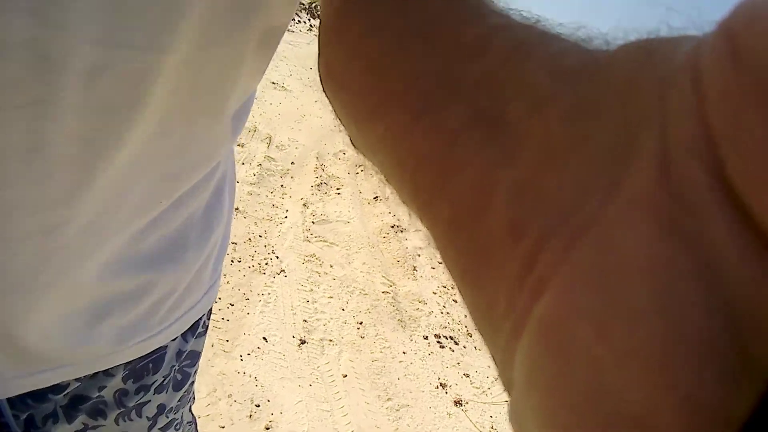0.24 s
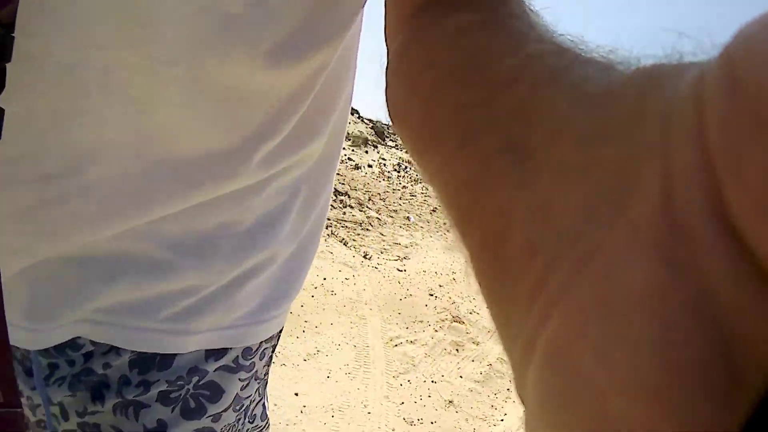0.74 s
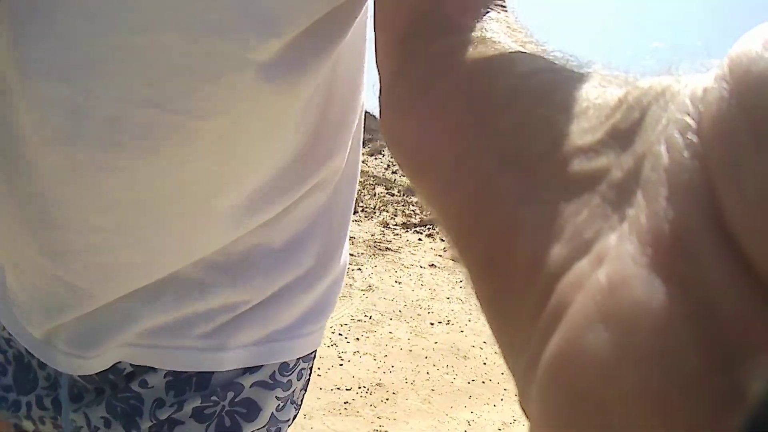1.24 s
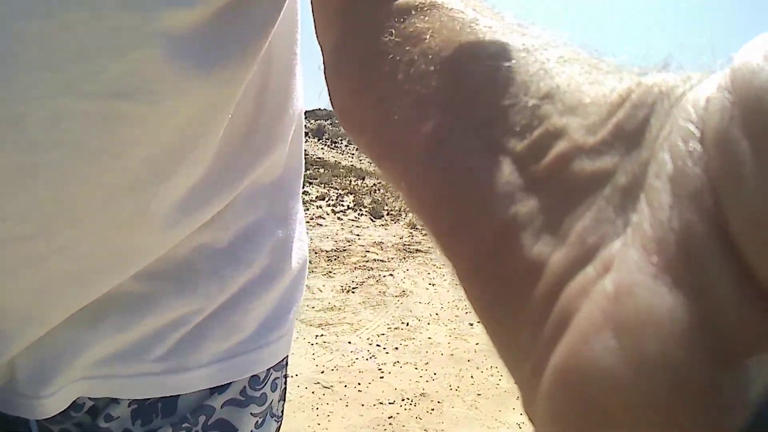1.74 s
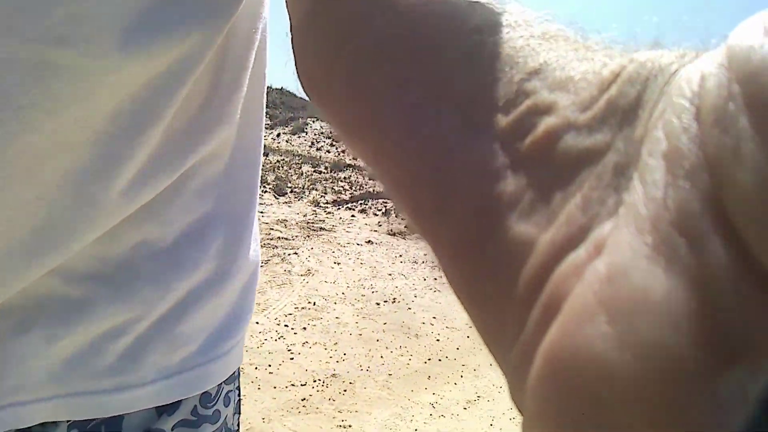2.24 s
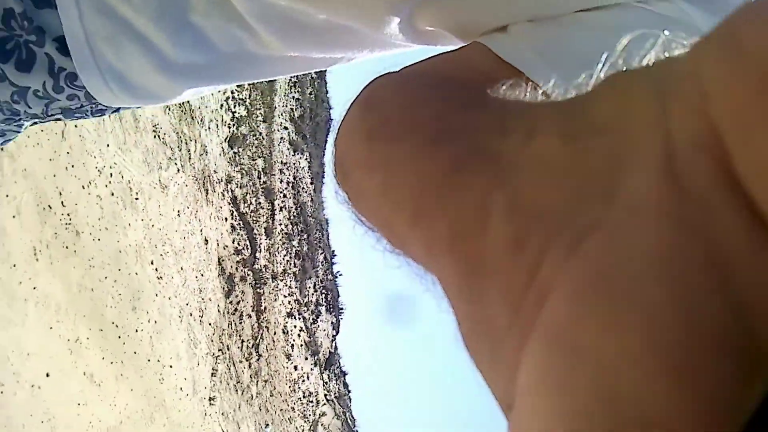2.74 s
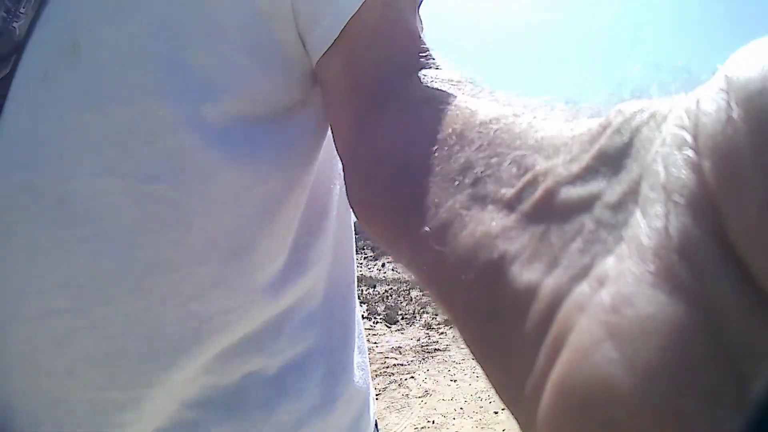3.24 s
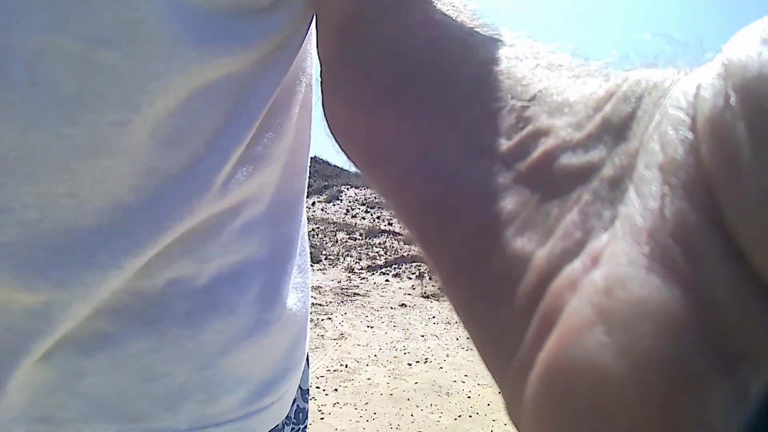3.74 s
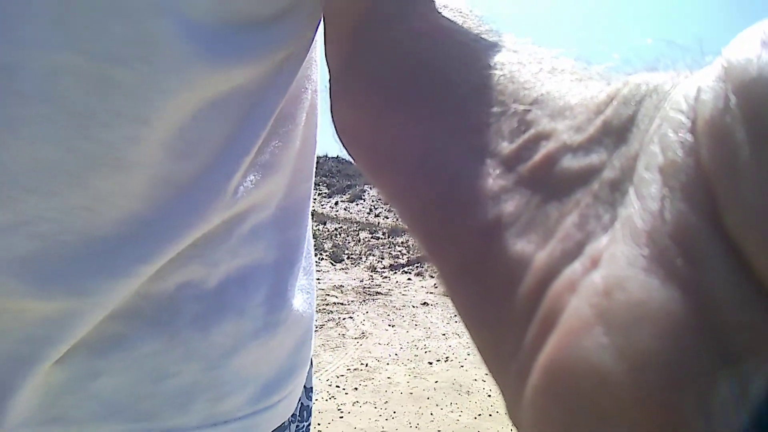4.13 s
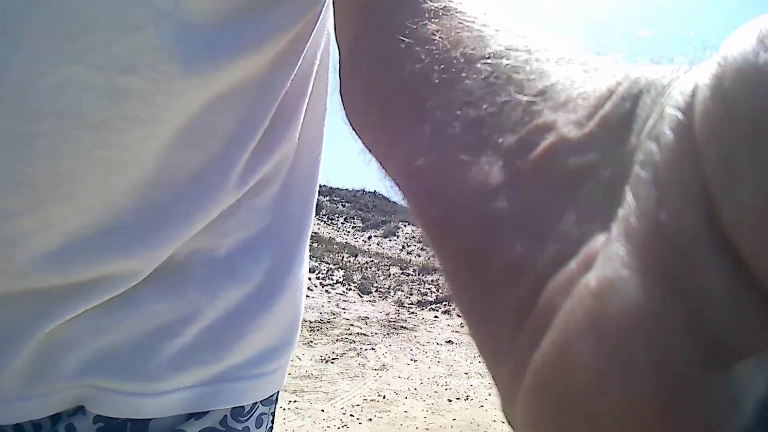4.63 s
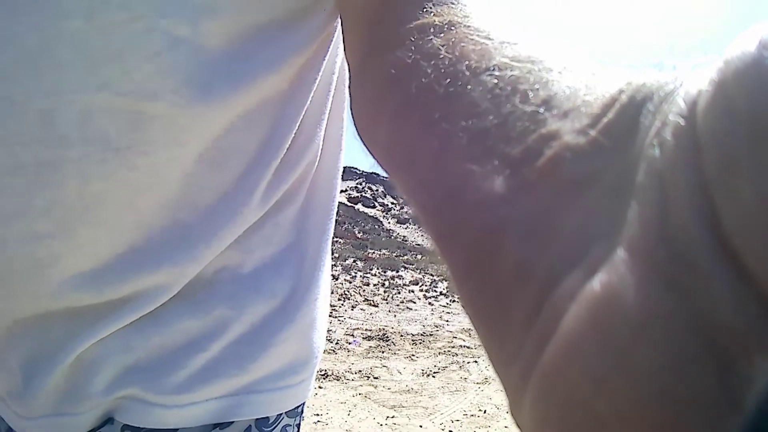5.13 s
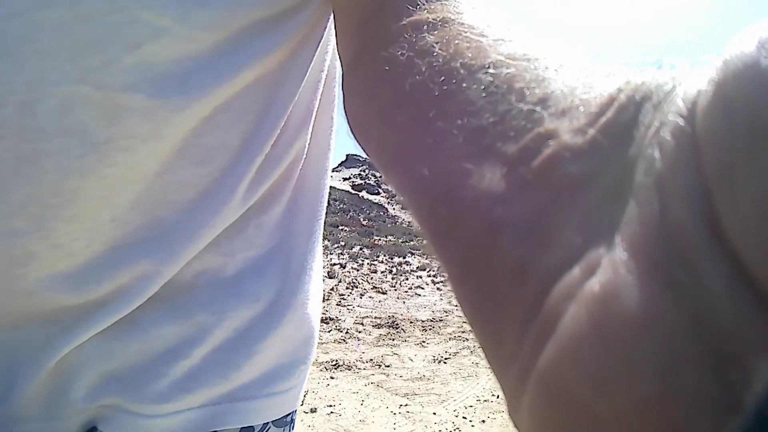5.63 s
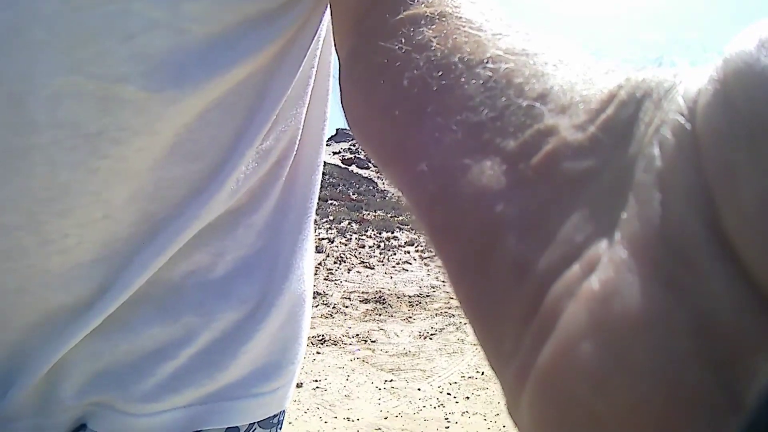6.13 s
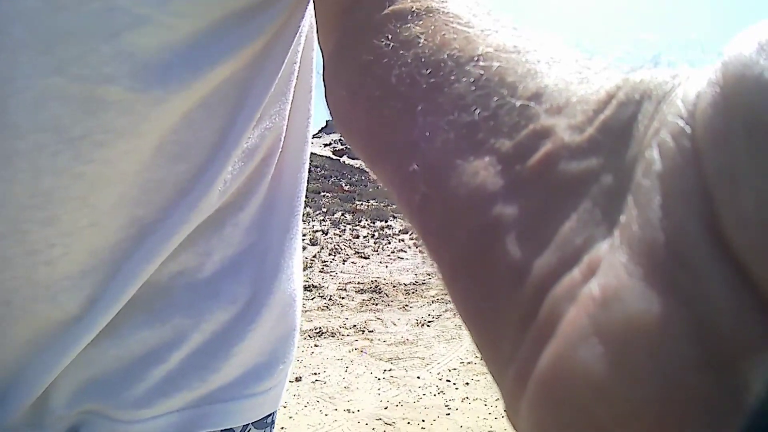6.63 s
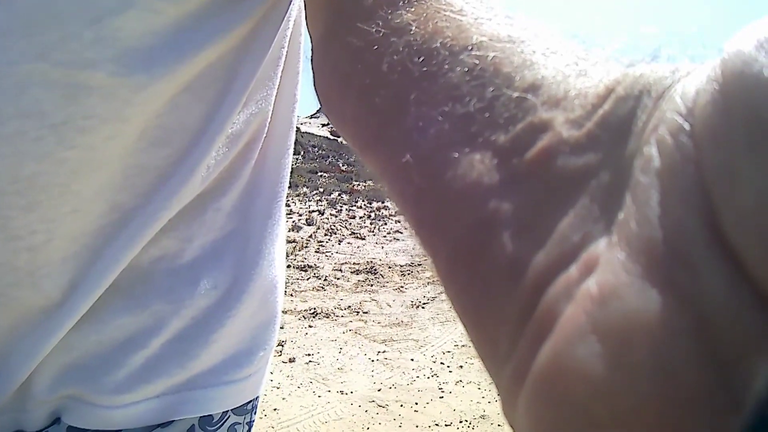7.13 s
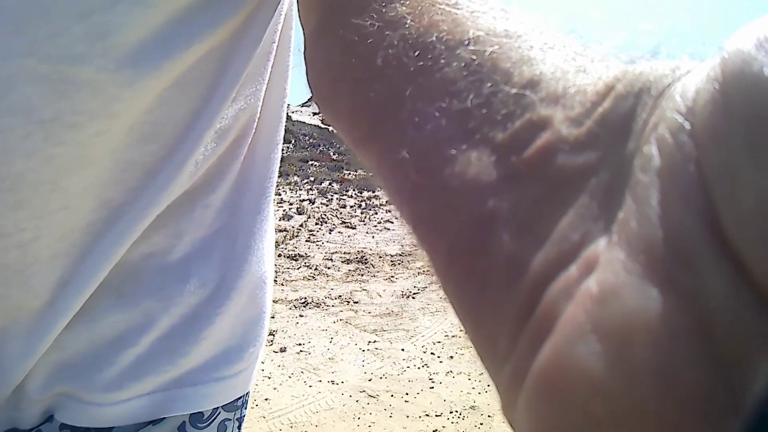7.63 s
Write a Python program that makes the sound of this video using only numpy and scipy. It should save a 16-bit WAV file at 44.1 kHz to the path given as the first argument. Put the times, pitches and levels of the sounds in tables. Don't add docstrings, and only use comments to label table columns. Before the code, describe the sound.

Hand rubs and knocks on a hollow foam shell, then a small electric motor revs up, sags, and bursts into a loud steady whine.

```python
import sys
import numpy as np
from scipy import signal
from scipy.fft import rfft, irfft
from scipy.io import wavfile
from scipy.ndimage import uniform_filter1d, minimum_filter1d

SR = 44100
rng = np.random.default_rng(int(sys.argv[2]) if len(sys.argv) > 2 else 0)


def waveform_to_disk(signal):
    frames = np.transpose(np.atleast_2d(signal))
    scaled = np.clip(frames, -1, 1) * 32767
    samples = np.round(scaled).astype(np.int16)
    wavfile.write(sys.argv[1], SR, samples)


def field_ratio(decibels):
    return 10 ** (np.asarray(decibels, dtype=float) / 20)


N = 347067

# (centre [Hz], width [Hz], level [dB])
SHELL = [(260, 16, 0), (400, 120, -12), (596, 610, 22.5), (790, 240, 18), (1310, 150, 20), (2100, 78, 18),
         (3200, 500, -53)]
FULL_HZ = 330


def evened(x):
    return x / np.sqrt(np.mean(x ** 2) + 1e-20)


def coloured(points):
    f, db = np.transpose(points)
    hz = np.fft.rfftfreq(N + 1, 1 / SR)
    gain = field_ratio(np.interp(np.log(hz + 1), np.log(f), db))
    return evened(irfft(rfft(rng.standard_normal(N + 1)) * gain)[:N])


def drift(rate_hz):
    step = 40
    lowpass = signal.butter(2, rate_hz, fs=SR / step, output="sos")
    slow = signal.sosfilt(lowpass, rng.standard_normal(N // step + 2))
    return evened(np.interp(np.arange(N) / step, np.arange(len(slow)), slow))


def resonate(x, hz, width):
    return signal.lfilter(*signal.iirpeak(hz, hz / width, SR), x)


def curve(rows):
    s, *columns = np.transpose(rows)
    return [np.interp(np.arange(N) / SR, s, c) for c in columns]


def breeze():
    # (frequency [Hz], density [dB per Hz])
    wind = [(15, -35), (25, 0), (58, 2.5), (97, -6.5), (176, -5.5), (592, -17.5), (1330, -19.5),
            (2620, -33), (3170, -34), (4000, -46.5), (5200, -75.5), (8800, -120)]
    return field_ratio(-52 + 0.94 * drift(3.1)) * coloured(wind)


def strokes(column, fade_db):
    # (start [s], hold [s], rub level [dB], low ring level [dB], rumble level [dB])
    rubs = [(0.0, 0.11, -52.5, -36, -40), (0.126, 0.053, -30, -51, -44), (.195, 0.15, -43.5, -43, -45),
            (0.33, 0.0096, -31, -26.5, -42), (0.364, .03, -52, -52, -42), (0.401, 0.055, -46, -62, -47),
            (1.458, 0.0085, -46, -70, -54), (1.484, .095, -49.5, -47, -53), (1.583, 0.057, -30.5, -24, -52),
            (1.673, 0.019, -36, -40, -50), (1.716, 0.097, -26, -19.5, -45), (1.803, 0.14, -31, -30.5, -42),
            (2.992, .09, -27, -51, -58)]
    attack_s = 0.0034
    t, power = np.arange(N) / SR, np.zeros(N)
    for row in rubs:
        rise = np.clip((t - row[0]) / attack_s, 0, 1)
        fade = fade_db * np.clip(t - row[0] - row[1], 0, 1)
        power += (rise * field_ratio(row[column] - fade)) ** 2
    return np.sqrt(power)


def knock(db, hz, bright_db, crack):
    t = np.arange(len(crack)) / SR
    blow = crack * field_ratio(-60 * t / 0.011)
    patch = resonate(blow, hz, 360)
    mode = np.sin(2 * np.pi * hz * t) * field_ratio(-60 * t / 0.047)
    body = 0.67 * patch / abs(patch).max() - 0.5 * mode
    boom = -0.3 * np.sin(2 * np.pi * SHELL[0][0] * t) * field_ratio(-60 * t / 0.068)
    bright = resonate(resonate(crack, 1470, 1200), 1800, 2500)
    tick = field_ratio(bright_db + 9.0) * bright * field_ratio(-60 * t / 0.029)
    return field_ratio(db - 6.0) * np.minimum(t / 0.0021, 1) * (body + boom + tick)


def shell_knocks():
    # (time [s], peak level [dB], pitch [Hz], bright part [dB])
    blows = [(0.118, -21, 780, -7), (0.136, -23, 580, -16), (0.14, -21, 794, 12), (0.154, -15, 720, -5),
             (0.174, -24, 824, -13), (0.221, -22, 660, 3), (0.259, -15.5, 776, -26), (0.297, -24, 750, -7),
             (0.313, -18, 660, -8), (0.337, -10.5, 637, -38), (0.406, -30.5, 1220, 5),
             (0.434, -24.5, 1260, -16), (0.877, -33, 835, -10), (1.024, -36.5, 1380, 4),
             (1.199, -37, 1510, -16), (1.349, -54, 681, -15), (1.462, -29, 1180, -26),
             (1.55, -17, 840, -30), (1.584, -4, 711, -31), (1.604, -17, 740, -23), (1.628, -21.5, 950, 6.5),
             (1.671, -18, 850, -23), (1.706, -12, 730, -25), (1.748, -21, 711, -15), (1.796, -12, 960, -27),
             (2.714, -7.5, 1160, -22)]
    length = 3000
    out = np.zeros(N + length)
    for (s, *blow), crack in zip(blows, rng.standard_normal((len(blows), length))):
        out[round((s + 0.0015) * SR):][:length] += knock(*blow, crack)
    return out[:N]


def shell_rubbing():
    grit = rng.standard_normal(N) * field_ratio(2.4 * drift(73))
    (low_hz, low_width, _), *upper = SHELL
    rub = evened(sum(field_ratio(db) * resonate(resonate(grit, hz, width), hz, 2.2 * width)
                     for hz, width, db in upper))
    noise_ring = resonate(resonate(rng.standard_normal(N), low_hz, low_width), low_hz, 3.5 * low_width)
    steady_ring = np.sin(2 * np.pi * low_hz * np.arange(N) / SR + 1.4 * drift(14.3))
    ring = evened(evened(noise_ring) + 1.5 * steady_ring)
    rumble = coloured([(20, -4), (60, -0.5), (170, -7.5), (400, -14.5), (900, -42)])
    rub_fade, ring_fade = 700, 454
    held = strokes(2, rub_fade) * field_ratio(-2.0) * rub + strokes(4, rub_fade) * rumble
    return held + strokes(3, ring_fade) * field_ratio(-5.5) * ring


def order_levels(speed, effort_db, squeeze_db, lean_db):
    # (level at full speed [dB], slope [dB per octave], squeeze share [1], lean share [1])
    order_1 = (-13.5, 22.5, -0.08, 1.1)
    order_2 = (-8.5, 20, -0.15, -1.48)
    order_4 = (-15.5, 14.5, 0.73, 0.94)
    order_6 = (-26, 11.5, 0.2, 1.14)
    octaves = np.log2(speed / FULL_HZ)
    levels = []
    for full_db, slope_db, squeeze_share, lean_share in (order_1, order_2, order_4, order_6):
        grip_db = squeeze_share * squeeze_db + lean_share * lean_db
        levels.append(effort_db + full_db + slope_db * octaves + grip_db)
    return levels


def airframe_db(hz):
    # (centre [Hz], width [Hz], lift [dB])
    modes = [(262, 66, 4.5), (523, 130, 0.5), (950, 167, 7.5), (1557, 211, 11.5)]
    grid = np.arange(6000.)
    lift = sum(db / (1 + (2 * (grid - f) / width) ** 2) for f, width, db in modes)
    return np.interp(hz, grid, lift)


def shaft_orders(turn, speed, slack, part_load, strong_db):
    # (order [1], index of the strong order followed [1], relative level [dB], part-load gain [dB])
    weak = [(3, 0, -18, 10), (5, 2, -18, 5), (7, 3, -8, -0.5), (8, 3, -11.5, 4), (9, 3, -17.5, 0),
            (10, 3, -13, 3.5), (11, 3, -13, -0.5), (12, 3, -10, 0), (14, 3, -17, 3), (16, 3, -19.5, 7)]
    orders = list(zip((1, 2, 4, 6), strong_db))
    orders += [(k, strong_db[int(leader)] + db + gain_db * part_load) for k, leader, db, gain_db in weak]
    wobble = (0.007 + 0.12 * slack ** 2) * drift(50)
    tone = 0
    for k, db in orders:
        sign = 1 if k == 1 else -1
        lag = 8 * np.sqrt(k) * slack * (k % 4 == 2)
        phase = k * (turn + wobble) + 0.28 * max(k - 2, 0) - lag + 0.42 * drift(2.32)
        waver_db = (0.92 + 3.0 * slack) * drift(18)
        tone = tone + sign * field_ratio(db + airframe_db(k * speed) + waver_db) * np.cos(phase)
    return tone


def second_rotor(turn, first_db):
    # (order [1], level relative to the main first order [dB])
    twin = [(2, -10.5), (4, -20.5)]
    tone = 0
    for k, db in twin:
        phase = k * 1.046 * turn + 0.3 * drift(5)
        tone = tone + field_ratio(first_db + db + drift(3.7)) * np.cos(phase)
    return tone


def air_rush(turn, speed, effort_db, slack, part_load):
    # (frequency [Hz], density [dB per Hz])
    hiss = [(30, -15), (120, -6), (300, -8), (800, 0), (1500, -3.5), (2000, -2), (2500, -7.5),
            (3200, -11.5), (3800, -13.5), (4500, -16)]
    rush = coloured(hiss) * (1 + 0.11 * np.cos(turn))
    dull = signal.sosfiltfilt(signal.butter(2, 2500, fs=SR, output="sos"), rush)
    rush = dull + field_ratio(-28 * slack ** 2) * (rush - dull)
    level_db = -25 + 0.4 * effort_db - 1.9 * part_load + 5 * np.log2(speed / FULL_HZ)
    swell_db = (0.8 + 2 * slack) * drift(15)
    return field_ratio(level_db + 7.0 + swell_db) * rush


def motor():
    # (time [s], shaft speed [Hz], effort over the speed law [dB])
    throttle = [(1.83, 87.6, -8), (1.98, 153.9, -3.5), (2.07, 197.3, -4), (2.23, 248.2, -4.5),
                (2.315, 265, -3.5), (2.38, 252.7, -1), (2.45, 230, -0.5), (2.57, 146.4, 3.5),
                (2.74, 94.9, 1), (2.93, 64.5, -2.5), (2.99, 83.1, -3), (3.06, 169.9, -4.3),
                (3.145, 315, 0.3), (3.2, 332.3, 0.9), (3.5, 330.5, 0.3), (3.6, 329.6, -0.8),
                (5.6, 328.8, -0.42), (7.87, 327.5, -1.6)]
    # (time [s], squeeze [dB], lean [dB])
    grip = [(2.74, -2.7, 1), (2.9, 21.5, -2), (3.07, -8.5, 2.3), (3.13, -11, -0.4), (3.2, 6.5, -2.5),
            (3.5, -3, -1), (3.6, -1.3, 0.4), (3.81, -8, -0.3), (4.08, -12, 1), (4.29, 2.5, -0.44),
            (4.93, -3.5, 0.2), (5.05, -1, 0), (5.84, -2, 0.25), (6.15, 0.5, 0.64), (6.86, -2.2, 1),
            (7.01, 2, 2.5), (7.5, -8.5, 1), (7.87, -11, 1.9)]
    controls = uniform_filter1d(curve(throttle) + curve(grip), size=800, axis=1)
    speed, effort_db, squeeze_db, lean_db = controls
    on = np.clip((np.arange(N) / SR - throttle[0][0]) / 0.015, 0, 1)
    slack = np.clip(1 - speed / FULL_HZ, 0, 1)
    part_load = np.minimum(slack / 0.16, 1)
    turn = 2 * np.pi * np.cumsum(speed + 0.7 * drift(2.523)) / SR
    strong_db = order_levels(speed, effort_db, squeeze_db, lean_db)
    tone = shaft_orders(turn, speed, slack, part_load, strong_db) + second_rotor(turn, strong_db[0])
    return on * (field_ratio(5.5) * tone + air_rush(turn, speed, effort_db, slack, part_load))


def scene():
    return (breeze() + shell_rubbing() + shell_knocks() + motor())[None]


def overloaded_converter(x):
    up, down = 80, 441
    bent = x + 0.014 * x ** 2
    leaky = signal.firwin(6001, 4800, fs=SR * up)
    slow = signal.resample_poly(np.clip(bent, -0.7, 0.68), up, down, window=leaky)
    return signal.resample_poly(np.clip(slow, -0.72, 0.72), down, up, window=("kaiser", 8.0))


def masked_band_loss(x):
    keep_db, moody_db, grain_db = -38.5, 3.0, -20.0
    window = np.sqrt(signal.windows.hann(2048, sym=False))
    shape = dict(fs=SR, window=window, nperseg=2048, noverlap=1024)
    hz, t, z = signal.stft(x, **shape)
    band = (hz // 172).astype(int)
    starts = np.flatnonzero(np.diff(band, prepend=-1))
    power = np.add.reduceat(abs(z) ** 2, starts, axis=0) + 1e-20
    mood = moody_db * rng.standard_normal(len(t)) + 2.5 * rng.standard_normal(power.shape)
    loud = -minimum_filter1d(-power.max(0), size=3)
    margin_db = 10 * np.log10(power / loud) - keep_db - mood
    beside = np.maximum(np.roll(power, 1, axis=0), np.roll(power, -1, axis=0))
    valley_db = 10 * np.log10(power / beside) + 9.5 - mood
    margin_db = np.minimum(margin_db, valley_db)
    kept = np.clip(margin_db[band] / 2 + np.maximum(1700 - hz, 0)[:, None], 0, 1)
    grain = rng.standard_normal(z.shape) + 1j * rng.standard_normal(z.shape)
    grain = grain * np.sqrt(uniform_filter1d(abs(z) ** 2, size=7, axis=0) / 2 + 1e-20)
    clean, grain = (signal.istft(kept * part, **shape)[1][:N] for part in (z, grain))
    quick, slow = (abs(uniform_filter1d(clean ** 2, size=n)) + 1e-14 for n in (256, 2048))
    return clean + field_ratio(grain_db) * np.sqrt(np.minimum(quick / slow, 1)) * grain


def roll_off(x):
    return signal.sosfilt(signal.butter(12, 15720, fs=SR, output="sos"), x)


def record(dry):
    converted = overloaded_converter(dry[0])
    thinned = masked_band_loss(np.pad(converted, (0, 8)))
    mix = np.clip(thinned, -0.708, 0.708)[None]
    return roll_off(mix)


dry = scene()
out = record(dry)
waveform_to_disk(out)
```